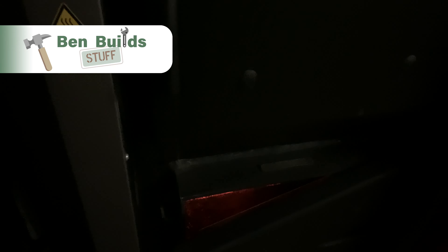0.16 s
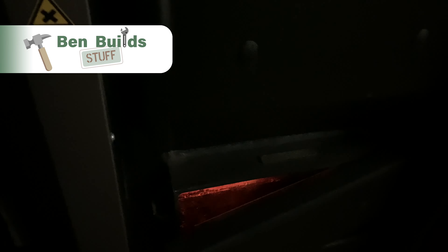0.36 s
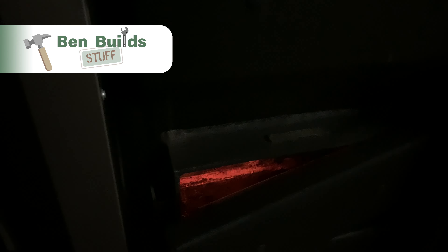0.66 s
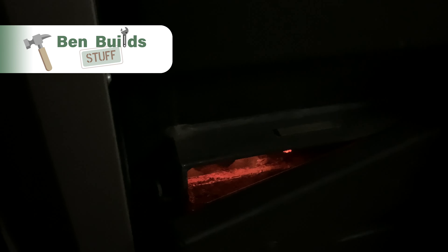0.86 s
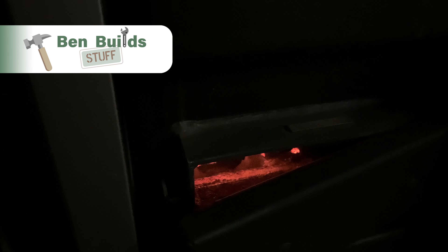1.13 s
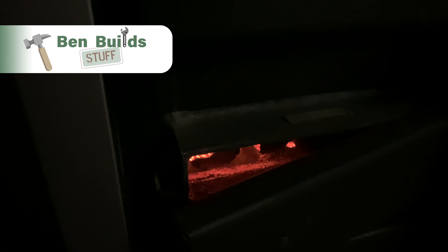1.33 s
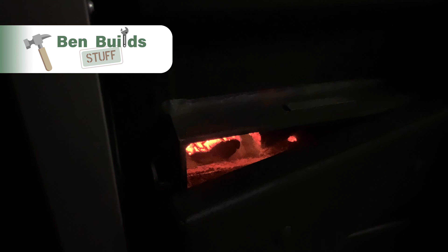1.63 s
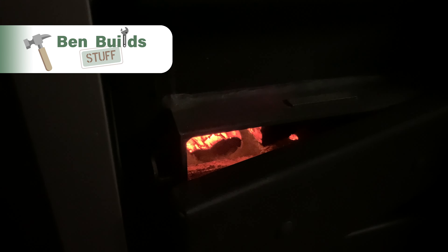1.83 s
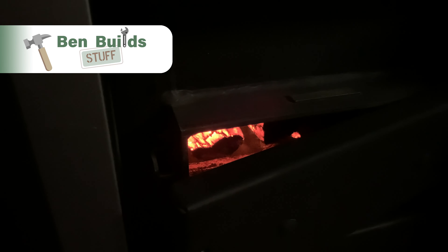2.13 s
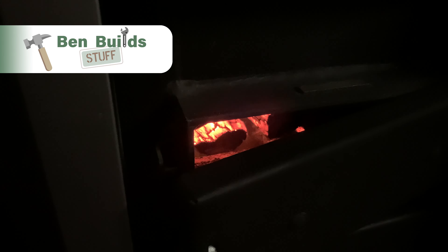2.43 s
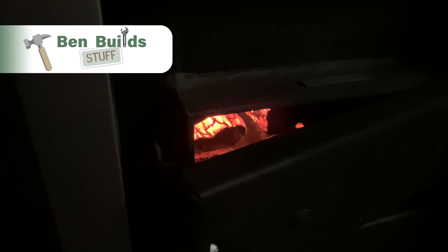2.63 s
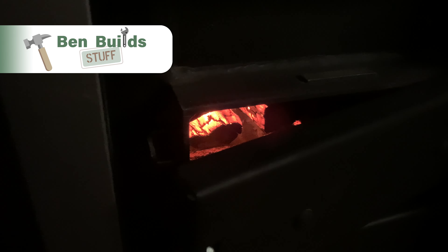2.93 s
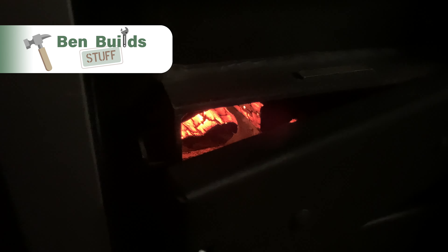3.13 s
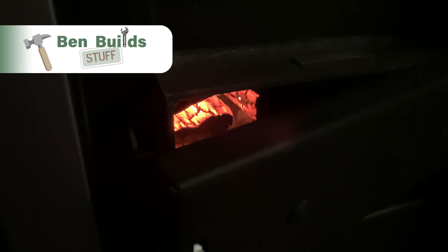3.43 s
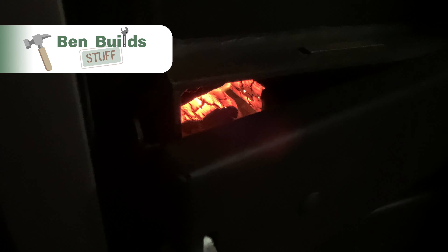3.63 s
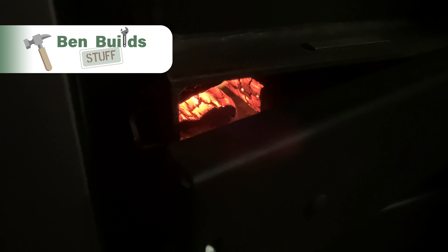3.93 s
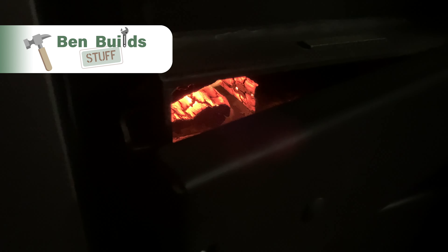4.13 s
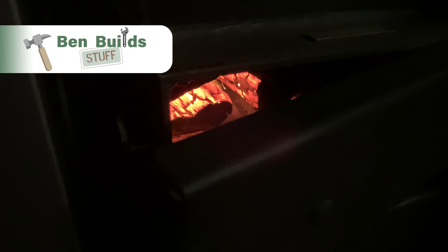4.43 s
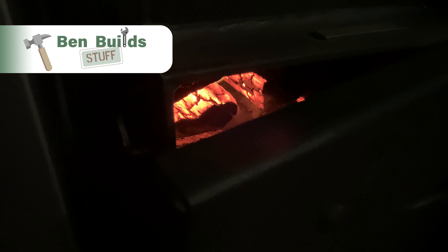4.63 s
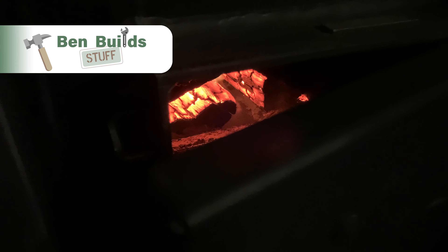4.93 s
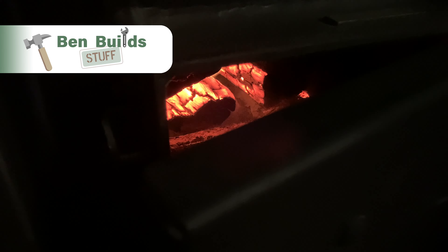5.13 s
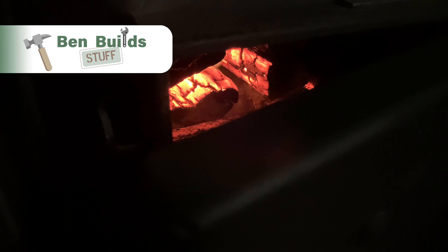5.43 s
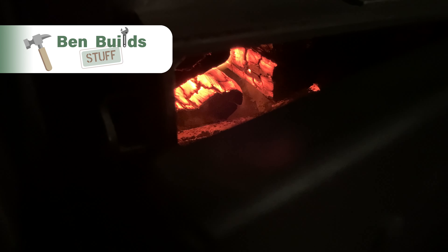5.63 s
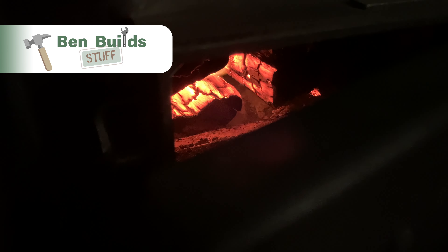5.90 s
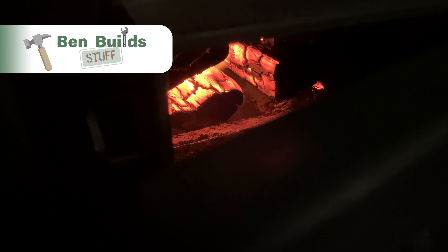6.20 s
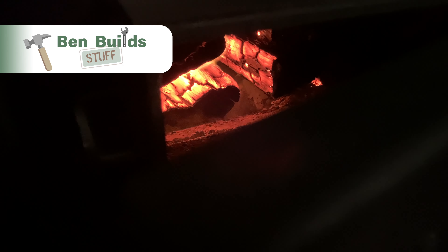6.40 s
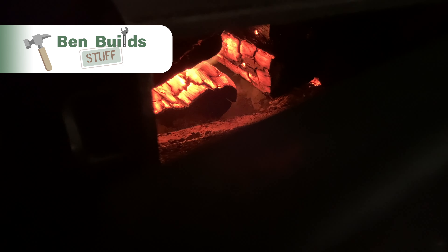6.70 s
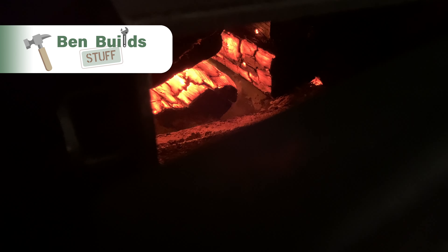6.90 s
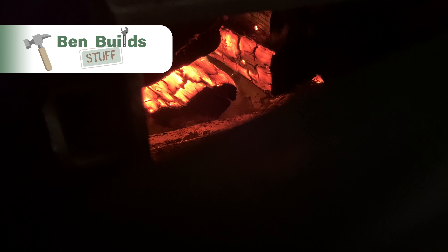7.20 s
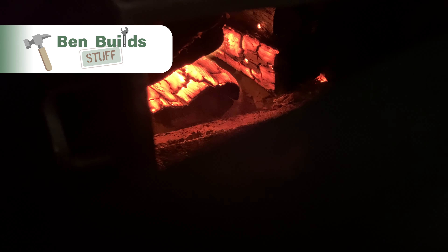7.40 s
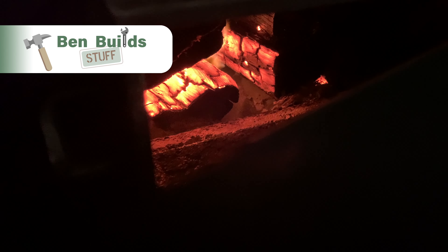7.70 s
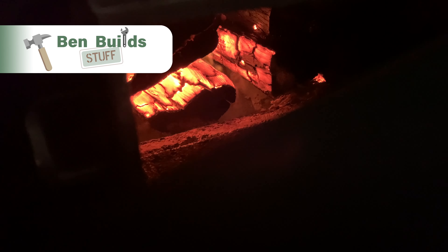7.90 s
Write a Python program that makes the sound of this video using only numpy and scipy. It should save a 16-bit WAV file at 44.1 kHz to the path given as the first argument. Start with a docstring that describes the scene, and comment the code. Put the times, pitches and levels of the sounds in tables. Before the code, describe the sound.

A wood-fired boiler runs throughout in a small utility room, heard from close to its slightly open door. Its fan and draught make a low, hollow hum that slowly grows louder, with uneven rumbling surges around 3 seconds and again from 5 seconds onward. A soft rush of air and a very faint sizzle sit behind it.

The burning wood gives a loud, sharp crack right at the start, at about 0.1 seconds. More cracks follow at about 2.9 and 3.5 seconds, a duller one at 6 seconds and a last sharp one at 8 seconds. Each is brief, with a slight knock from the firebox and a short room echo. Smaller snaps come near 0.4, 1.5 and 5 seconds. Faint, high ember ticks are scattered between them and bunch together just before the end, where the hum is loudest.

```python
"""A small utility room, a wood boiler burning with its door ajar; a phone microphone slowly nears the fire.
The fan's draught roars in the hollow modes of firebox and flue. Burning wood cracks and ticks, ringing
the logs, the firebox and the room. Behind them air rushes and whistles at the door, and sap and gas
sizzle out of the wood over a faint hiss."""
import sys
import numpy as np
from scipy import signal
from scipy.fft import rfft, irfft, next_fast_len
from scipy.io import wavfile
from scipy.ndimage import uniform_filter1d

SR = 44100
rng = np.random.default_rng(int(sys.argv[2]) if len(sys.argv) > 2 else 0)


def inscribe(sig):
    """Save sig as 16-bit PCM at rate SR to the path in sys.argv[1].

    A 1-D sig is mono; a 2-D sig holds one channel per row.
    Samples are clipped to [-1, 1] before scaling.
    """
    pcm = np.round(np.clip(np.atleast_2d(sig).T, -1, 1) * 32767)
    wavfile.write(sys.argv[1], SR, pcm.astype(np.int16))


N = 355049

# In front of the boiler, the low flue boom surges and sags unevenly while growing louder; the roar
# rises slowly. Each row: time in seconds, flue boom in dB, firebox roar in dB.
DRAUGHT_LEVELS = [(0.0, -47, -46.5), (0.7, -43.5, -45.5), (1.6, -43, -45), (2.4, -41.5, -44.5),
                  (2.95, -37, -44), (3.35, -41.5, -44), (4.0, -39.5, -44.5), (4.6, -39.5, -43),
                  (5.3, -35.5, -41), (5.6, -39.5, -41), (5.85, -33, -41), (6.05, -38, -40.5),
                  (6.3, -35, -40), (6.7, -38, -40.5), (7.1, -33, -40.5), (7.5, -35, -38.5),
                  (8.05, -31, -40)]
# Hollows of the flue and the air duct. Each row: pitch in Hz, width in Hz, relative level in dB.
FLUE_MODES = [(52.6, 16, -2), (36.38, 11, -24), (74.6, 28, -28.5), (112, 37, -22.5)]
DUCT_MODES = [(699, 48, -2.5), (771.5, 43, 0), (862, 41, -4.5)]
# Hollows of the firebox. Each row: pitch in Hz, width in Hz, relative level in dB at the quietest,
# dB gained for each dB that the roar rises.
ROAR_MODES = [(140, 26, -10, 1.87), (179.65, 23, 2.5, 1.19), (253.4, 25, -3, 0.44), (348.2, 41, -7.5, 1.76),
              (440, 85, -23.5, 2), (534, 82, -11.5, 1.35), (624, 71, -18, 1.46)]


def draught(duct_db, size):
    """Turbulent air excites flue, duct and firebox; the boom grows in surges, the roar rises slowly."""
    boom_db, roar_db = curves(DRAUGHT_LEVELS)
    quiet_db = roar_db.min()
    like = along(STEREO_LIKENESS, size)
    flutter_db = 1.33 * walk(11)  # the flame pulls duct and firebox along together
    out = noise_pair(size, like, hollow(FLUE_MODES, size))[:, :N] * undb(boom_db)
    out += noise_pair(size, like, hollow(DUCT_MODES, size))[:, :N] * undb(duct_db + flutter_db)
    for hz, width, db, swell in ROAR_MODES:
        mode = noise_pair(size, like, resonance(hz, width, size))[:, :N]
        out += mode * undb(quiet_db + db + swell * (roar_db - quiet_db) + flutter_db)
    return out


# Band centres in Hz, low thud to top fizz. A crack's colour is one level in dB for each band.
CRACK_BANDS_HZ = (185, 340, 600, 950, 1500, 2300, 3300, 4400, 5800, 8000, 11000, 14500)
# Wood cracking behind the door. Each row: start in seconds, twelve band levels in dB,
# then scatter among the logs and room echo, both in dB against the burst.
WOOD_CRACKS = [(0.1379, -13.5, -15.5, -20, -21, -24.5, -19.5, -21, -21, -27, -19, -16, -44, -2, -23),
               (0.3755, -58, -56, -71, -59, -68, -51.5, -57, -59, -46.5, -39.5, -37.5, -38, -15, -24),
               (1.46, -48.5, -49, -43.5, -48, -47.5, -42, -46.5, -51.5, -38.5, -34.5, -34, -38, -14.5, -23),
               (2.8702, -25, -28, -33, -41, -37.5, -33, -33, -37.5, -37.5, -30, -26.5, -28, -20, -28.5),
               (3.477, -22, -23, -21.5, -26.5, -26.5, -27.5, -32.5, -30.5, -28.5, -25, -30.5, -46.5, -15.5, -27),
               (4.575, -65, -67, -64, -67, -62.5, -64, -70, -70, -60, -56, -46, -55, -21, -19),
               (4.6114, -70, -67, -72, -72, -66, -69, -68, -74, -59, -61, -67, -62, -8, -27),
               (5.0141, -70, -69.5, -74, -75, -63, -59, -63, -68.5, -55, -44.5, -42, -44, -18, -23),
               (6.046, -28, -27, -35.5, -45, -49, -53.5, -60, -62, -59, -31.5, -42.5, -55, -11, -23),
               (6.314, -69, -70.5, -68, -71, -58.5, -53.5, -60, -60.5, -53, -53, -48, -51, -9, -23),
               (7.9975, -23, -17.5, -30, -38, -33.5, -39, -40, -38, -50, -26.5, -21, -27, -23, -35)]
# Embers in the firebox. Each row: start in seconds, level in dB, pitch in Hz.
EMBER_TICKS = [(0.421, -60, 13000), (0.473, -48, 11400), (1.6092, -60, 5300), (2.571, -62, 12000),
               (3.331, -57.5, 11060), (3.349, -71, 10500), (3.793, -55, 11700), (3.997, -46.5, 11500),
               (4.235, -60, 10600), (4.398, -52, 12200), (4.427, -61.5, 13000), (4.9704, -57, 10600),
               (5.776, -62, 11500), (6.069, -53, 10500), (6.228, -70, 10970), (6.358, -48.5, 12900),
               (6.4075, -63, 13000), (6.795, -62.5, 7390), (6.906, -60, 11900), (7.61, -63, 12970),
               (7.8638, -47, 11700), (7.88, -56, 11000), (7.8925, -52, 7500), (7.934, -47, 12300),
               (7.988, -52, 11000)]


def fire():
    """Wood cracks and embers tick; a tick is a thin crack around one pitch."""
    events = [(start, crack(np.array(colour), scatter_db, room_db, size=10240))
              for start, *colour, scatter_db, room_db in WOOD_CRACKS]
    for start, db, hz in EMBER_TICKS:
        octaves_off = np.abs(np.log2(np.array(CRACK_BANDS_HZ) / hz))
        colour = db + np.maximum(-26 * octaves_off, -23)
        events.append((start, crack(colour, scatter_db=-18, room_db=-23, size=4096)))
    out = np.zeros((2, N + SR))
    for start, sound in events:
        i = int(start * SR)
        out[:, i:i + sound.shape[1]] += sound
    low_cut = signal.butter(3, 140, "high", fs=SR, output="sos")  # a crack moves little air below this
    return signal.sosfilt(low_cut, out[:, :N])


def crack(colour, scatter_db, room_db, size):
    """One burst of fibres rings the firebox, the room and the logs."""
    out = firebox_ring(colour, size) + room_echo(colour, room_db, size)
    burst = splinters(colour, scatter_db)
    out[:, :burst.shape[1]] += log_ring(burst)
    return out


def splinters(colour, scatter_db, size=2048):
    """Fibres burst within a few ms and scatter among the logs in lumpy echoes, shorter when higher."""
    t = np.arange(size) / SR
    rise = 1 - np.exp(-t / .0012)
    thud = rise * np.exp(-t / 0.01)  # lows spread over more time
    like, out = along(CRACK_STEREO_LIKENESS, size), 0
    for hz, db in zip(CRACK_BANDS_HZ, colour):
        lumps = undb(3 * rng.standard_normal(size // 32)).repeat(32)
        burst = np.exp(-(t / .003 * (hz / 2300) ** .65) ** 2)
        scatter = undb(scatter_db) * np.exp(-t / 0.014 * (hz / 2300) ** .6)
        envelope = thud if hz < 1200 else rise * lumps * (burst + scatter)
        band = noise_pair(size, like, resonance(hz, .17 * hz, size)) * envelope
        out = out + level(band, db) * np.sqrt(.004 * SR / size)  # the energy of 4 ms at this level
    return out


# The logs in the fire. Each row: pitch in Hz, width in Hz, gain in dB.
LOG_MODES = [(1390, 68, -4.5), (1980, 370, 1), (2850, 300, 0.5), (3335, 350, -4.5), (4280, 600, 0)]


def log_ring(burst):
    """The logs ring briefly; part of the burst passes straight by."""
    rings = sum(undb(db) * signal.lfilter(*signal.iirpeak(hz, hz / width, SR), burst)
                for hz, width, db in LOG_MODES)
    return undb(-5) * burst + rings


# The firebox's hollow and steel plates. Each row: pitch in Hz, gain in dB, seconds to fall 60 dB.
CAVITY_RINGS = [(182.8, -2.5, 0.14), (255, -12, 0.18), (350, -5, 0.091), (546, -2.5, 0.095),
                (717, -4.5, 0.12)]
STEEL_RINGS = [(1580, -22, 0.2), (1965, -21, 0.24), (2210, -23, .25), (2560, -23.5, .28), (2740, -26, .28),
               (3100, -27, .24), (3700, -27, .25), (4310, -27, .22), (4830, -28, .25), (5800, -29.5, .2)]


def firebox_ring(colour, size):
    """The burst thumps hollow and plates, a little differently each time."""
    t = np.arange(size) / SR
    out = np.zeros(size)
    for hz, db, t60 in CAVITY_RINGS + STEEL_RINGS:
        detune, jitter_db = 1 + .02 * rng.standard_normal(), 1.2 * rng.standard_normal()
        tone = np.sin(2 * np.pi * hz * detune * t + rng.uniform(0, 2 * np.pi))
        drive_db = np.interp(hz, CRACK_BANDS_HZ, colour)
        out += undb(drive_db + db + jitter_db) * tone * undb(-60 * t / t60)
    return out * (1 - np.exp(-t / 0.0026))


# The close walls of the utility room. Each row: band centre in Hz, gain in dB, seconds to fall 60 dB.
ROOM_BANDS = [(300, -12.5, 0.41), (790, 4, 0.27), (1550, 8, 0.21), (2870, 3.5, .29), (4636, 5, 0.25),
              (6300, 0.5, 0.11), (8040, -5.5, 0.2), (10600, -4.5, 0.21)]


def room_echo(colour, room_db, size):
    """The walls answer a crack unevenly; the echo holds at first, then dies quickly."""
    t = np.arange(size) / SR
    spectrum = undb(along(list(zip(CRACK_BANDS_HZ, colour)), size))
    like = along(STEREO_LIKENESS, size)
    absorption = undb(along([(13000, -1.0), (15500, -14.0)], size))  # walls and air swallow the top
    out = np.zeros((2, size))
    for hz, db, t60 in ROOM_BANDS:
        band = resonance(hz, .36 * hz, size)
        lumps = uniform_filter1d(undb(2.4 * rng.standard_normal(size // 128)).repeat(128), 64)
        drive = np.average(spectrum, weights=band ** 2)
        tail = noise_pair(size, like, band * absorption) * lumps * drive
        out += tail * undb(room_db + db - 60 * (t / t60) ** 1.35)
    return out * (1 - np.exp(-t / 0.0029))


# Air at the gap of the door. Each row: frequency in Hz, relative level in dB.
RUSH_SPECTRUM = [(500, -4.5), (1000, -2), (1450, -5), (2100, -9), (2900, -12), (3500, -20.5), (5000, -32.5)]
# Whistles at its edges. Each row: pitch in Hz, width in Hz, relative level in dB.
EDGE_WHISTLES = [(1110, 60, -3), (1200, 32, 2), (1324, 65, -3), (1567, 50, -2), (1692, 38, 1.5),
                 (1857, 65, -3), (2100, 60, -6.5), (2733, 55, -7.5)]


def door_air(rush_db, size):
    """Air rushes at the door in flickering bands; faint whistles come and go at the edges."""
    like = along(STEREO_LIKENESS, size)
    shape = undb(along([(200, -43.0)] + RUSH_SPECTRUM + [(12000, -61.0)], size))
    bands = [(hz, .2 * hz) for hz in (695.4, 1100, 1722, 2600, 4000)]
    rush = flicker(noise_pair(size, like, shape), bands, depth_db=1.5, rate=9)
    edges = noise_pair(size, like, hollow(EDGE_WHISTLES, size))
    whistles = undb(-4.5) * flicker(edges, EDGE_WHISTLES, depth_db=2.0, rate=4)
    return (rush + whistles) * undb(rush_db + 0.65 * walk(8))


def sizzle(sizzle_db, size):
    """Sap and gas leave the wood, with brief rustles."""
    noise = noise_pair(size, along(STEREO_LIKENESS, size), resonance(4130, 2200, size))[:, :N]
    rustle_db = 1.6 * walk(25) + .5 * np.maximum(walk(60), 0) ** 2
    return noise * undb(sizzle_db + rustle_db)


# The hiss behind everything. Each row: frequency in Hz, relative level in dB.
HISS_SPECTRUM = [(3000, -14.5), (5000, -19.5), (7000, -6), (8500, 4.5), (11000, 3), (13500, 1),
                 (15700, 2.5), (16000, -41)]


def hiss(size):
    """A faint, high hiss that wavers slowly."""
    shape = undb(along([(500, -50.5)] + HISS_SPECTRUM, size))
    noise = noise_pair(size, along(STEREO_LIKENESS, size), shape)[:, :N]
    return noise * undb(-77 + walk(1.9))


# How alike left and right are for steady sound and echoes, and how alike for a direct crack.
# Each row: frequency in Hz, likeness from 0 to 1.
STEREO_LIKENESS = [(60, .97), (400, 1), (800, 0.1), (1400, 0), (5000, 0), (7000, 1), (9000, 0.96)]
CRACK_STEREO_LIKENESS = [(500, 0.94), (1500, 0.6), (5500, 0.1), (7000, .97)]


def noise_pair(size, likeness, gain):
    """Left and right noise of one colour and rms 1, sharing a part of each bin."""
    mid, side = rng.standard_normal((2, size // 2 + 1, 2)) @ np.array([1, 1j]) * gain
    like = np.clip(likeness, 0, 1)
    spectra = np.sqrt(1 + like) * mid + np.sqrt(1 - like) * side * np.array([[1], [-1]])
    return level(irfft(spectra, size), 0)


def flicker(noise, bands, depth_db, rate):
    """Noise split into bands of (Hz, width in Hz, ..), each wandering in level on its own."""
    size, spectrum = noise.shape[1], rfft(noise)
    shares = np.array([resonance(hz, width, size) for hz, width, *_ in bands])
    return sum(irfft(spectrum * share, size)[:, :N] * undb(depth_db * walk(rate))
               for share in shares / shares.sum(axis=0))


def walk(rate):
    """Random values held 1 / rate seconds and smoothed twice; rms 1."""
    hold = int(SR / rate)
    steps = np.repeat(rng.standard_normal(N // hold + 1), hold)
    return level(uniform_filter1d(uniform_filter1d(steps, hold), hold)[:N], 0)


def resonance(hz, width_hz, size):
    """Gain of a resonance passed twice, so its skirts are steep."""
    f = np.fft.rfftfreq(size, 1 / SR) + 1
    return 1 / (1 + ((f - hz ** 2 / f) / (2 * width_hz)) ** 2 * 2)


def hollow(modes, size):
    """Gain of several resonances side by side."""
    return np.sqrt(sum((undb(db) * resonance(hz, width, size)) ** 2 for hz, width, db in modes))


def along(table, size):
    """Rows of (Hz, value) joined on a log-frequency axis, one value for each bin."""
    hz, value = np.transpose(table)[:2]
    return np.interp(np.log(np.fft.rfftfreq(size, 1 / SR) + 1), np.log(hz), value)


def curves(table):
    """Rows of (seconds, value, ..) joined by straight lines, one curve for each value column."""
    times, *columns = np.transpose(table)
    return [np.interp(np.arange(N) / SR, times, column) for column in columns]


def undb(db):
    """Gain of a level in dB."""
    return 10 ** (np.asarray(db) / 20)


def level(x, db):
    """Scaled to an rms level."""
    return x * undb(db) / np.sqrt(np.mean(x ** 2))


# The upper layers drift. Each row: time in seconds, then duct, door air and sizzle levels in dB.
LEVEL_DRIFT = [(0.0, -57, -61.5, -73), (1.4, -57, -62, -73), (2.1, -57.5, -62.5, -78.5),
               (3.3, -59, -63.5, -79.5), (4.4, -62.5, -63.5, -79.5), (4.57, -65, -63.5, -75),
               (4.7, -59, -63.5, -78.5), (4.97, -59, -64.5, -73), (5.6, -60, -62.5, -78.5),
               (7.5, -58.5, -62.5, -80), (8.05, -59, -59, -78.5)]


def scene():
    """The boiler from in front of its door: draught, air, sizzle, hiss and fire."""
    duct_db, rush_db, sizzle_db = curves(LEVEL_DRIFT)
    size = next_fast_len(N)
    steady = draught(duct_db, size) + door_air(rush_db, size) + sizzle(sizzle_db, size) + hiss(size)
    return steady + fire()


# The capsule dulls at the top. Each row: frequency in Hz, gain in dB.
MIC_RESPONSE = [(12500, 0), (16000, -2)]
# The phone's stereo balance. Each row: frequency in Hz, left minus right in dB.
STEREO_BALANCE = [(300, 0), (1200, 3), (3000, 0.9), (5300, -4), (6800, 0.46)]


def record(dry):
    """The phone's stereo image: treble leads on the right, low mids lag there; the top is cut."""
    size = next_fast_len(N + 512)
    f = np.fft.rfftfreq(size, 1 / SR)
    lag_rad_per_hz, lead_s, in_phase_hz, top_hz = .0007, .000211, 6400, 16500
    right_phase = np.maximum(-lag_rad_per_hz * f, 2 * np.pi * (f - in_phase_hz) * lead_s)
    tilt = undb(along(STEREO_BALANCE, size) / 2)
    response = undb(along(MIC_RESPONSE, size)) * np.array([tilt, np.exp(1j * right_phase) / tilt])
    stereo = irfft(rfft(dry, size) * response, size)[:, :N]
    return signal.sosfilt(signal.ellip(10, .2, 80, top_hz, fs=SR, output="sos"), stereo)


dry = scene()
out = record(dry)
inscribe(out)
```